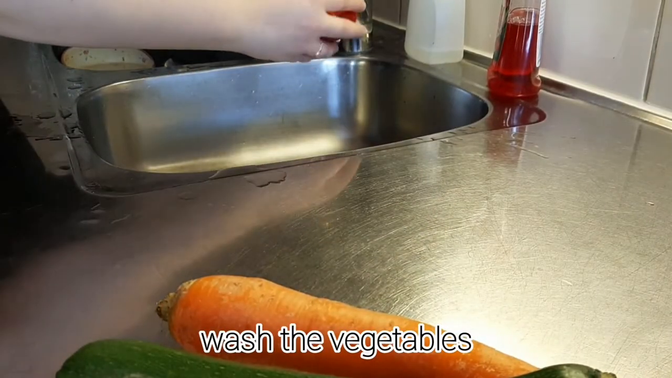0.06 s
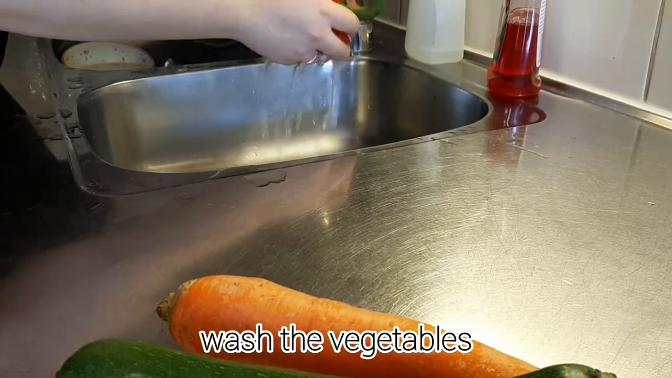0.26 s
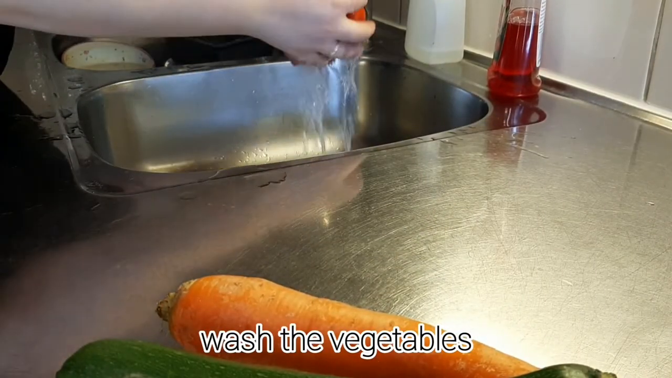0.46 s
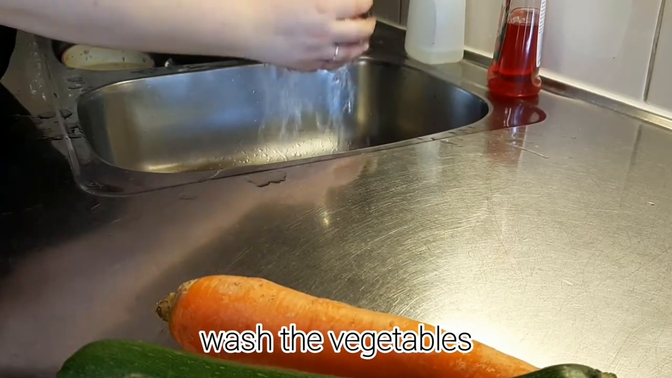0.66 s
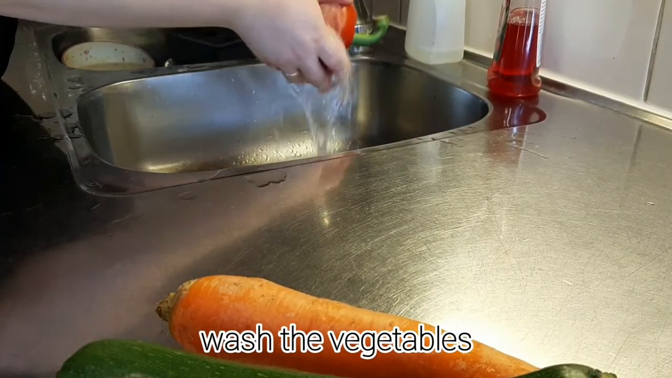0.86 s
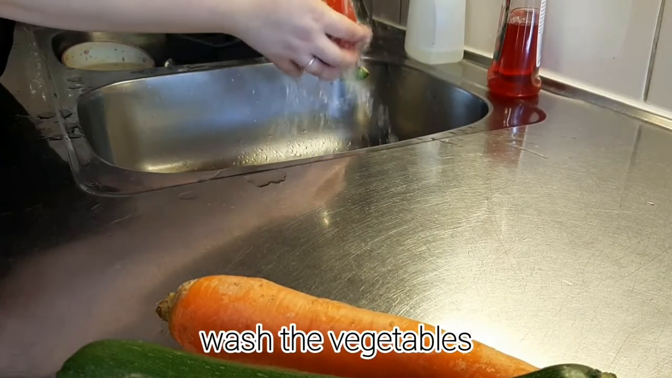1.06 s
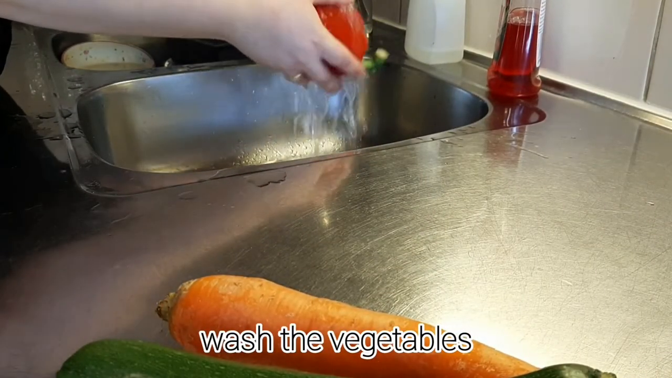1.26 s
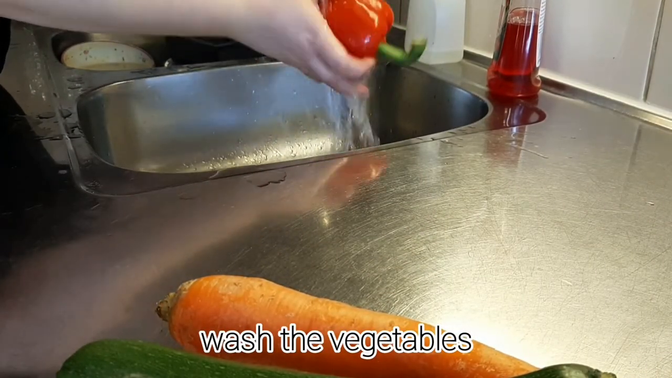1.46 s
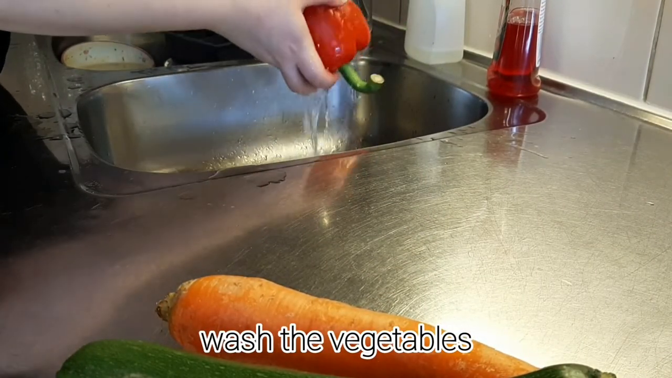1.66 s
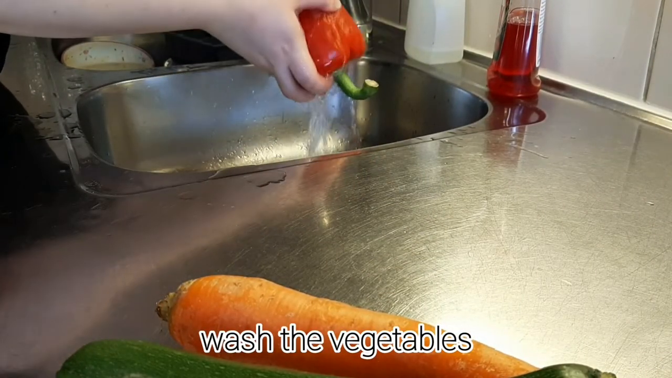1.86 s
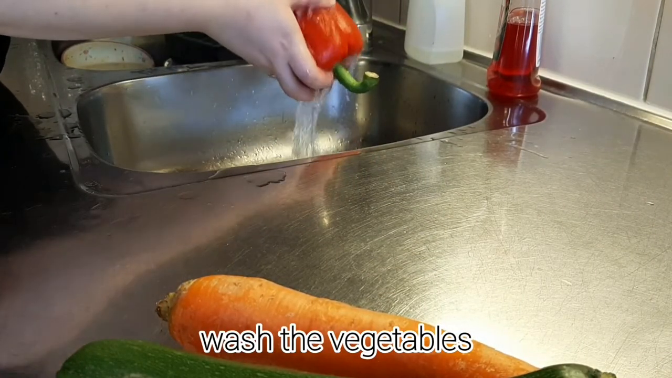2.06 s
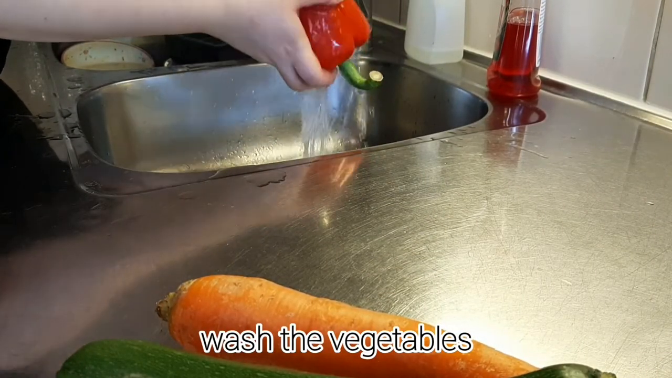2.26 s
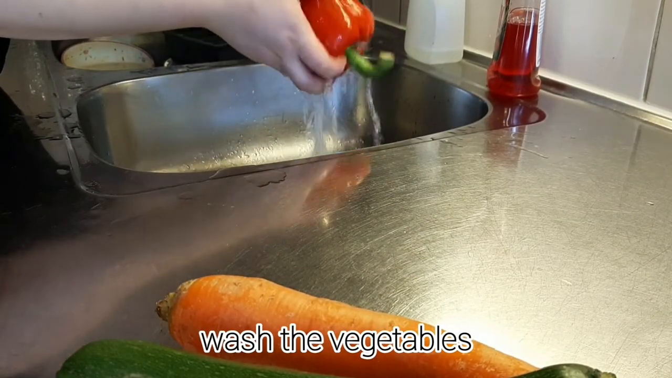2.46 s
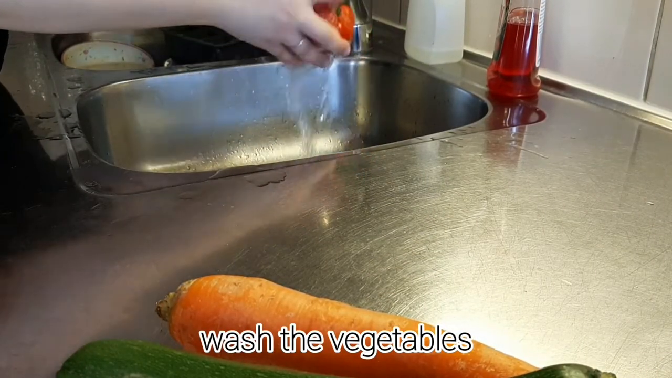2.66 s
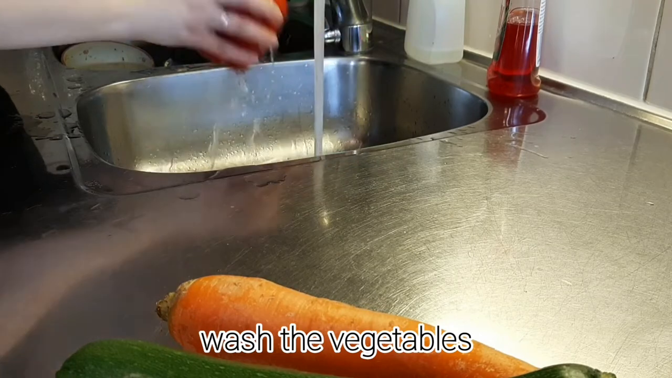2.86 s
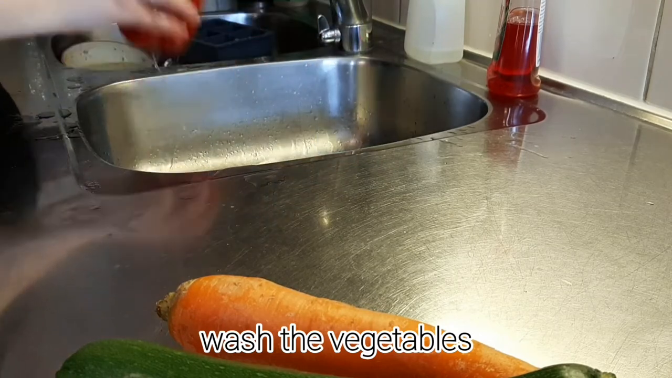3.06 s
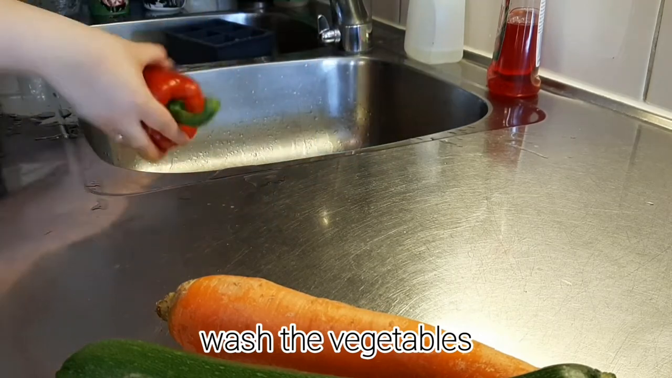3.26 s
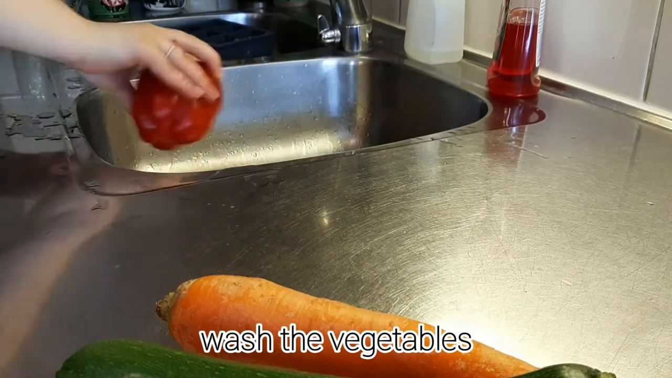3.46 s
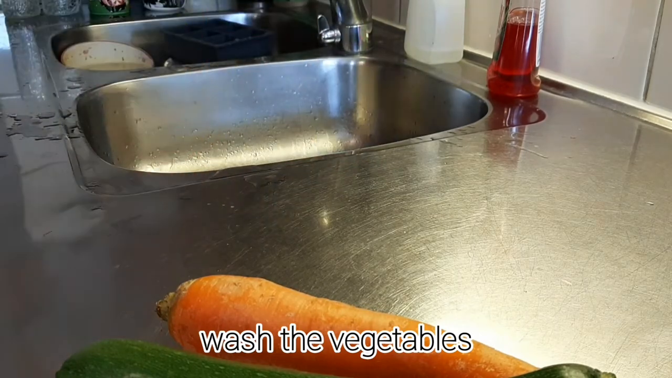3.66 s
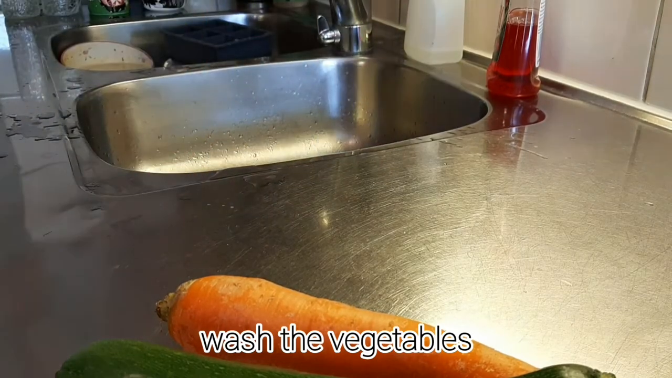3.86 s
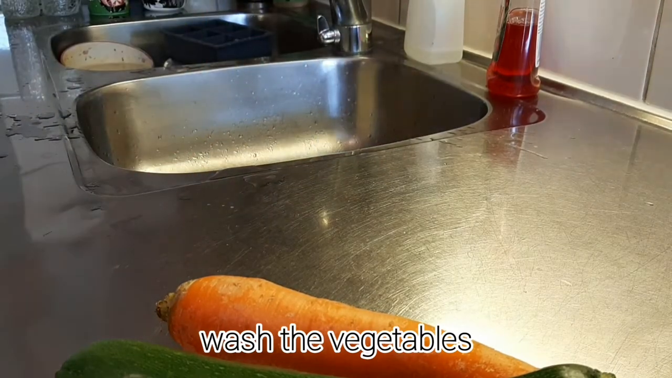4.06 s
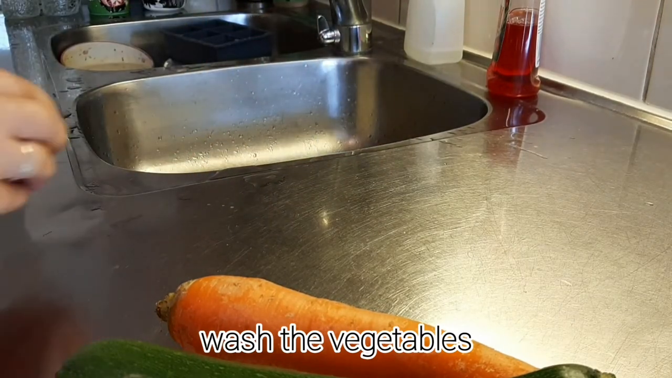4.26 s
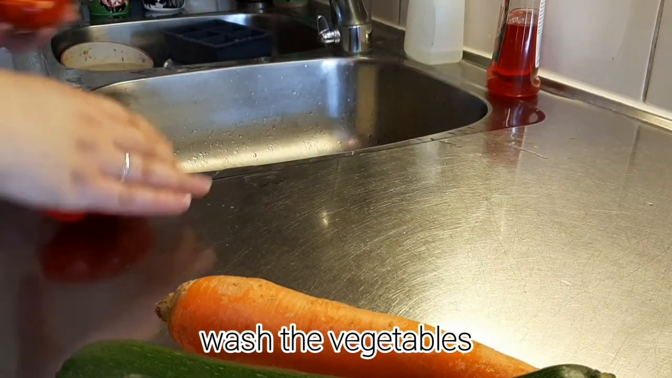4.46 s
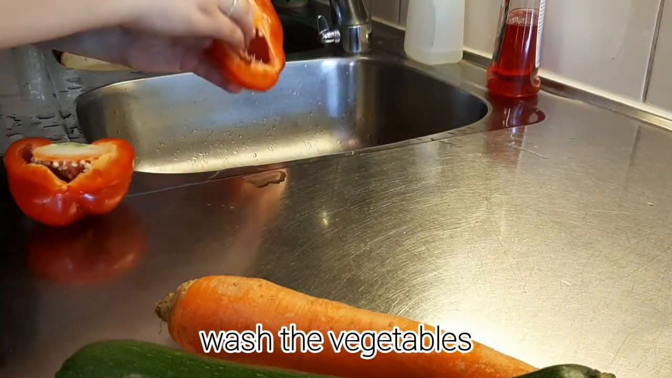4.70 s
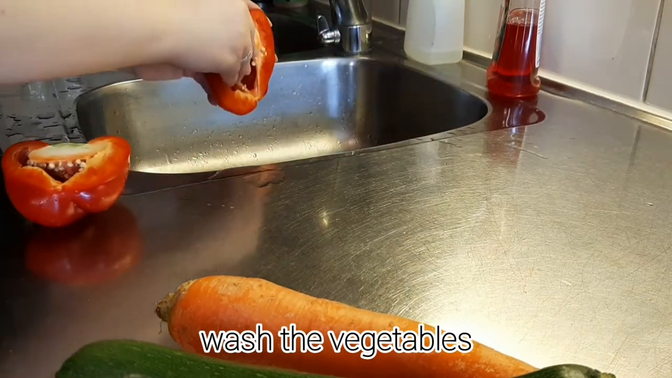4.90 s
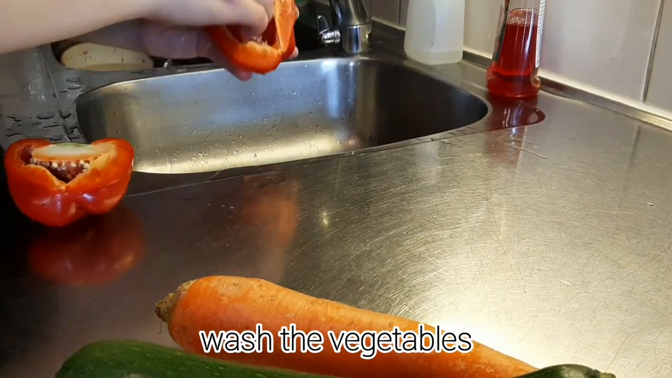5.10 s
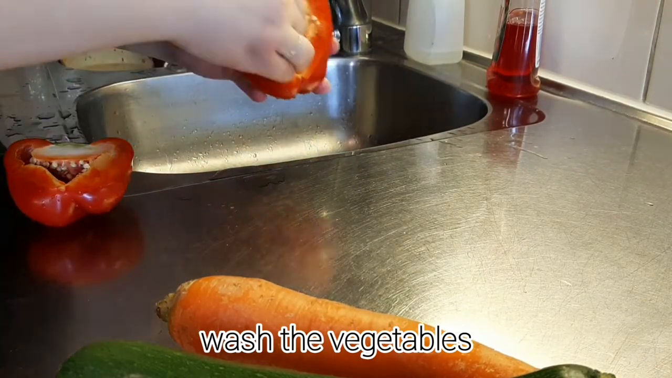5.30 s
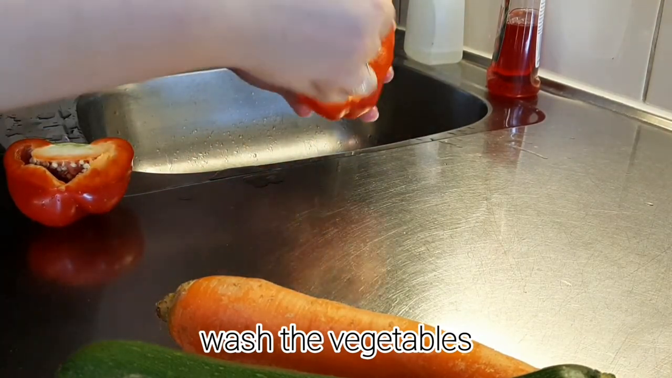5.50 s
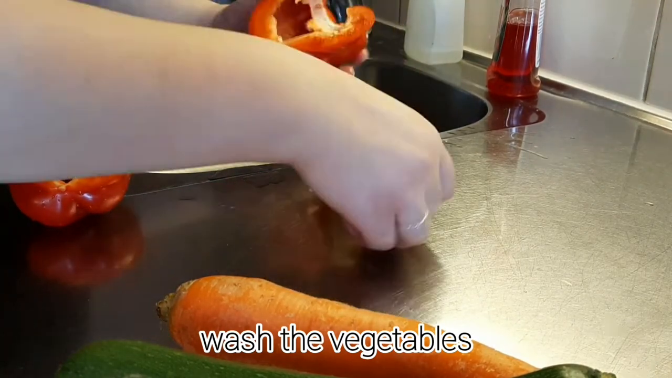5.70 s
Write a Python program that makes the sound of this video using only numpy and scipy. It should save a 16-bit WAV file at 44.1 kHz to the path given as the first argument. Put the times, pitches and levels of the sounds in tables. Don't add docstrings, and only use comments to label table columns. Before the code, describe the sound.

Tap water splashes over a pepper into a steel sink, stops with drips, then hands rustle, knock and snap the pepper's core.

```python
import sys
import numpy as np
from scipy import signal
from scipy.fft import irfft
from scipy.io import wavfile
from scipy.ndimage import uniform_filter1d

SR = 44100
rng = np.random.default_rng(int(sys.argv[2]) if len(sys.argv) > 2 else 0)


def volts_from_decibels(level):
    exponent = np.asarray(level, float) / 20
    return 10 ** exponent


def waveform_to_disk(signal):
    frames = np.transpose(np.atleast_2d(signal))
    scaled = np.clip(frames, -1, 1) * 32767
    samples = np.round(scaled).astype(np.int16)
    wavfile.write(sys.argv[1], SR, samples)


N = 253134
SHUT_S, LAST_SPRAY_S = 3.13, 3.08

# time_s [s], flow_db [dB], fineness_db [dB]
FLOW = [(0, -117, 8), (.06, -81, -2), (.098, -59, -2.5), (.25, -53, -5.5), (.3, -46.5, -0.5),
        (.41, -48, -8), (.5, -43, -5), (.76, -46.5, -6.5), (.96, -46, -5.5), (1.2, -47, -4),
        (1.77, -48.5, -2.5), (2.1, -46, -3.5), (2.26, -51, -1.5), (2.36, -45.5, -4.5), (2.77, -46.5, -6.5),
        (2.85, -41.5, -2), (3.0, -44.5, -6), (3.1, -74, -22)]
# pitch_hz [Hz], likeness [0-1]
SAME = [(60, 0.91), (130, 1), (290, 0.89), (640, 0.36), (1400, 0.), (16000, 0.)]


def evened(x):
    return x / np.sqrt(np.mean(x ** 2) + 1e-20)


def read(points, hz, axis=1):
    table = np.transpose(points)
    return np.interp(np.log(hz + 1), np.log(table[0] + 1), table[axis])


def curve(rows, t):
    s, *columns = np.transpose(rows)
    return [np.interp(t, s, c) for c in columns]


def grid(size):
    hz = np.fft.rfftfreq(size, 1 / SR)[:, None]
    return hz, np.arange(N * 4 // size + 5) * size / 4 / SR


def noise(gain):
    size = 2 * len(gain) - 2
    overlap = size * 3 // 4
    a, b, c, d = rng.standard_normal((gain.shape[1], len(gain), 4)).T
    same = np.clip(read(SAME, grid(size)[0]), -1, 1)
    left = a + 1j * b
    right = same * left + np.sqrt(1 - same ** 2) * (c + 1j * d)
    z = np.array([left, right])
    plain = signal.istft(left[:, :400], nperseg=size, noverlap=overlap)[1]
    scale = np.sqrt(np.mean(plain ** 2))
    return signal.istft(z * gain, nperseg=size, noverlap=overlap)[1][:, :N] / scale


def patches(shape, bins, frames):
    field = rng.standard_normal(shape[::-1]).T
    smooth = uniform_filter1d(field, bins, axis=0)
    return evened(uniform_filter1d(smooth, frames, axis=1))


def band(hz, spectrum, lo_hz, hi_hz):
    db = read(spectrum, hz)
    inside = (hz > lo_hz) * (hz < hi_hz)
    return db - 10 * np.log10(np.sum(volts_from_decibels(2 * db) * inside) / len(hz))


def ring(modes, detune=0.915, size=SR // 5):
    t = np.arange(size) / SR
    return sum((-1) ** k * volts_from_decibels(db - 60 * t / t60) * np.sin(2 * np.pi * hz * detune * t)
               for k, (hz, db, t60) in enumerate(modes))


def add(mix, s, sound):
    part = mix[round(s * SR):][:len(sound)]
    part += sound[:len(part)]


def scatter(per_s, spread_db, cap):
    out, count = np.zeros(N), int(per_s * N / SR)
    place, size = rng.random((count, 2)).T
    out[(place * N).astype(int)] = volts_from_decibels(spread_db * np.minimum(-np.log(size + 1e-9), cap))
    return out


def spray():
    # pitch_hz [Hz], density_db [dB per Hz]
    spray_colour = [(300, -24.5), (900, -7.5), (1800, -8), (3200, -3), (4200, -2.5), (6000, -5.5),
                    (11000, 0), (16000, -1)]
    # start_s [s], level_db [dB], pitch_hz [Hz], broad [0-1]
    splashes = [(0.066, -35, 1200, 0.03), (0.1, -34, 2110, 0.14), (0.2827, -35, 3680, 1),
                (0.308, -17, 3800, 0.1), (0.3375, -31, 3300, 0.7), (0.4748, -24, 2860, 0.3),
                (0.624, -17, 4260, 0), (0.6511, -18, 4060, 0.02), (0.679, -24, 4670, 0.1),
                (0.7302, -21, 4800, 0.28), (0.7625, -19, 4240, 0.58), (0.868, -21, 3060, 0.07),
                (0.9462, -30, 3650, 1), (1.055, -21, 3070, 0), (1.146, -26, 2580, 0.46),
                (1.324, -25.5, 3200, 0.33), (1.453, -32.5, 5250, 0.57), (1.519, -21, 1960, 0.33),
                (1.6031, -19, 5400, 0.31), (1.8103, -27, 5430, 0), (1.941, -24, 2940, 0.59),
                (2.13, -29.5, 3250, 0.52), (2.167, -21.5, 4680, 0), (2.3076, -33, 2950, 1),
                (2.4601, -19.5, 3340, 0.15), (2.547, -19, 5230, 0.27), (2.6207, -21.5, 3580, 0.4),
                (2.829, -32.5, 3870, 1), (2.902, -31.5, 3960, 0.95), (2.9924, -24.5, 2800, 0.37),
                (0.2623, -40, 2980, 0), (0.612, -21.5, 7600, 0), (0.6684, -19, 4300, .05),
                (0.9065, -34, 4580, 0.75), (1.0804, -31, 2040, 0.5), (1.4865, -31, 4690, 0.4),
                (1.677, -26, 8040, .02), (1.696, -29, 7600, 0), (1.8532, -25, 1540, 0),
                (1.926, -33, 5850, .3), (2.0015, -33, 3550, .2), (2.0443, -34, 4190, .2),
                (2.1026, -27, 1500, 0), (2.4369, -38, 2990, 0), (2.5152, -24, 5250, 0),
                (2.596, -24.5, 4200, .2), (2.9736, -28, 4620, 0.6), (1.635, -22.5, 1490, 0.35),
                (0.548, -32, 3320, 0.1), (1.753, -33, 3920, 0.03)]
    burst_t60_s, burst_db, slower_per_db = 0.061, -17.5, 0.076
    hz, t = grid(256)
    level_db, fineness_db = curve(FLOW, t)
    mist_db = level_db + fineness_db
    high = np.clip((hz - 7500) / 3000, 0, 1)
    field_db = band(hz, spray_colour, 2500, 8950)
    field_db = field_db + (1 - high) * (level_db + 0.33) + high * (mist_db + 5.0)
    shape = field_db.shape
    field_db += 1.8 * patches(shape, 9, 16)
    field_db += 2.27 * patches(shape, 60, 4)
    field_db += 1.7 * patches(shape, 25, 40)
    power = volts_from_decibels(2 * field_db) * (t < FLOW[-1][0])
    for s, db, centre_hz, broad in splashes:
        t60 = burst_t60_s * np.exp(slower_per_db * (burst_db - db))
        peak = np.exp(-(np.log((hz + 1) / centre_hz) / 0.15) ** 2)
        hump = volts_from_decibels(read(spray_colour, hz) * 0.92) * (abs(broad) + peak)
        now = (t > s + .0015) & (t < s + t60)
        power[:, now] += (hump * volts_from_decibels(db + 0.5 - 60 * (t[now] - s) / t60)) ** 2
    return noise(np.sqrt(power))


def bubbles(per_s=340.0):
    level_db = curve(FLOW, np.arange(N) / SR)[0]
    out = np.zeros((2, N))
    for hz in np.geomspace(280, 6000, num=16):
        t = np.arange(int(14 * SR / hz)) / SR
        rising = np.sin(2 * np.pi * hz * t * (1 + 0.0051 * hz * t))
        tone = rising * np.exp(-t * hz / 7.3) * np.minimum(t * hz, 1)
        hits = scatter(per_s / 16, 5.4, 2.6) * (hz / 1000) ** 0.21
        out += signal.oaconvolve(hits, tone)[:N] * rng.uniform(0.091, 1, (2, 1))
    return volts_from_decibels(level_db - 18.0) * evened(out) * (np.arange(N) < LAST_SPRAY_S * SR)


def sink():
    # pitch_hz [Hz], level_db [dB], t60_s [s]
    basin_modes = [(139, 2, 0.057), (185, -1.5, 0.16), (250.6, -3, 0.13), (333, 1, 0.049),
                   (375.6, 0.5, 0.063), (420, -4, 0.12), (550.8, 0, 0.081), (682, -5.5, 0.12),
                   (737.5, -0.5, 0.13), (900, -8.5, 0.058), (1290, -3.5, 0.039), (1520, -2, 0.046),
                   (2045, -7, 0.091), (1069, -8, 0.036)]
    # time_s [s], level_db [dB]
    landing = [(0, -9), (.2, -3), (.3, 1), (.8, -1), (1.2, -1), (1.6, 0.5), (2.3, 0), (2.85, -2.5),
               (2.97, -5.5), (3.13, -3.5)]
    base_db, follows, full_flow_db = -49, 0.36, -47.5
    t = np.arange(N) / SR
    drum_db = base_db + curve(landing, t)[0] + follows * (curve(FLOW, t)[0] - full_flow_db)
    out = np.zeros((2, N))
    for spot in rng.standard_normal((3, len(basin_modes) + 1)):
        slow = uniform_filter1d(rng.standard_normal(N // 100 + 1), 40)
        wander = evened(np.repeat(slow, 100)[:N])
        struck = rng.random((2, N)) < 500. / SR
        size_db = 3.36 * np.minimum(rng.exponential(1, (2, N)), 5)
        blows = struck * volts_from_decibels(size_db + 2.17 * wander)
        blows *= rng.choice([-1., 1.], (2, N))
        modes = [(hz, db + 2.0 * d, t60) for (hz, db, t60), d in zip(basin_modes, spot)]
        body = ring(modes, 1 + 0.0059 * spot[-1])
        out += signal.oaconvolve(blows + 0.45 * blows[::-1], body[None], axes=1)[:, :N]
    return evened(out) * volts_from_decibels(drum_db + 1.5) * np.clip((SHUT_S - t) / 0.0072, 0, 1)


def fizz(per_s=1500.0):
    # pitch_hz [Hz], relative_size [ratio]
    droplet_sizes = [(1500, 0.5), (4000, 0.87), (8000, 1.5), (14000, 2.6)]
    level_db = curve(FLOW, np.arange(N) / SR)[0]
    out = np.zeros((2, N))
    for hz in np.geomspace(1500, 14000, num=12):
        t = np.arange(int(10 * SR / hz)) / SR
        tick = np.sin(2 * np.pi * hz * t) * np.exp(-t * hz / 2.8) * read(droplet_sizes, hz)
        hits = np.array([scatter(per_s / 12, 5.0, 3.5) for side in range(2)])
        out += signal.oaconvolve(hits + 0.17 * hits[::-1], tick[None], axes=1)[:, :N]
    return volts_from_decibels(level_db - 10.0) * evened(out) * (np.arange(N) < LAST_SPRAY_S * SR)


def fan():
    # pitch_hz [Hz], density_db [dB per Hz]
    fan_colour = [(20, -26), (65, -9.5), (90, -7.5), (110, 3.5), (135, -2.5), (190, -17), (242, -10),
                  (310, -23), (500, -33), (800, -59), (1250, -50.5), (3000, -60.5), (16000, -65)]
    # time_s [s], level_db [dB]
    whistle_levels = [(0, -66), (.08, -65), (.2, -82), (3.1, -72), (3.22, -69), (3.3, -68.5), (3.5, -69.5),
                      (4.12, -73), (4.17, -69), (4.55, -66.5), (4.8, -73), (5.1, -69), (5.25, -69.5),
                      (5.7, -73.5)]
    rumble_db, pipe_db, fade_in_s = -49, 2.5, 0.11
    hz, frames = grid(4096)
    t = np.arange(N) / SR
    whistle_db = curve(whistle_levels, t)[0]
    low = np.clip((400 - hz) / 200, 0, 1)
    low_db = rumble_db + pipe_db * (frames < SHUT_S) - 9 * np.clip(1 - frames / fade_in_s, 0, 1)
    level_db = low * low_db + (1 - low) * -48
    rumble = noise(volts_from_decibels(band(hz, fan_colour, 85, 150) + level_db + 2.5))
    wander = uniform_filter1d(rng.standard_normal((2, N)), 900)
    wander = evened(uniform_filter1d(wander, 900))
    phase = 2 * np.pi * np.cumsum(1532 + 14 * wander[0]) / SR
    whistle = np.sin(phase + np.array([[0], [1.9]]))
    return rumble + volts_from_decibels(whistle_db + 3 * wander[1]) * whistle


def surges(width_hz=53.0):
    # middle_s [s], half_length_s [s], level_db [dB], pitch_hz [Hz]
    ropes = [(0.312, .06, -49, 372), (.35, .025, -47.5, 830), (0.69, 0.057, -48, 410), (1, 0.029, -49, 300),
             (1.598, 0.012, -47.5, 900), (1.97, 0.054, -53, 520), (2.498, .1, -48, 350),
             (2.849, .03, -50, 610), (3, 0.022, -64, 410), (1.1, 0.018, -46, 613), (2.7, .02, -47.5, 660),
             (1.55, .1, -52.5, 725), (1.9, .12, -54, 745), (2.4, 0.15, -52.5, 736), (2.15, .1, -54.5, 550),
             (2.6, 0.044, -50, 425), (2.07, .03, -52, 1250), (3.0, .015, -51.5, 1300)]
    out, t = np.zeros(N), np.arange(N // 8) / SR
    r = np.exp(-np.pi * width_hz / SR)
    for (s, half, db, hz), churn in zip(ropes, rng.standard_normal((len(ropes), len(t)))):
        poles = [1, -2 * r * np.cos(2 * np.pi * hz / SR), r * r]
        tone = evened(signal.lfilter([1, 0, -1], poles, churn))
        add(out, s - 2 * half, volts_from_decibels(db) * np.exp(-(t / half - 2) ** 2) * tone)
    return out


def knocks():
    # start_s [s], level_db [dB], contact_s [s], scuff_db [dB relative to blow]
    blows = [(0.957, -27.5, 0.00041, -30), (0.975, -36, 0.00045, -34), (3.403, -41.5, 0.00031, -43.5),
             (3.502, -43, 0.00056, -36), (3.734, -52, 0.00018, -25), (3.747, -48, 0.00024, -31),
             (4.086, -40.5, 0.00052, -42), (4.4113, -31, 0.0019, -43), (4.426, -34, .004, -40),
             (4.414, -34, 0.00017, -30), (4.418, -27.5, 0.00041, -32), (4.423, -31.5, 0.00025, -35),
             (4.4327, -28.5, 0.0017, -32), (4.439, -33, 0.00048, -26), (4.95, -45, 0.00011, -8),
             (5.651, -33.5, 0.0051, -43), (5.667, -22.5, 0.0005, -18), (5.671, -21, .00022, -13.5),
             (5.676, -19, 0.000096, -21), (5.682, -19, 0.00019, -33), (5.69, -24.5, 0.001, -42),
             (5.6968, -29, 0.00066, -22), (5.7035, -39, .0003, -18)]
    # pitch_hz [Hz], level_db [dB], t60_s [s]
    worktop_modes = [(93.5, -4.5, 0.056), (189, -5, 0.051), (284, -9, 0.035), (468, 8, 0.014),
                     (620, -9, 0.019), (760, 0, 0.022), (867, -1, 0.015), (1486, 2.5, 0.019),
                     (1923, 2, 0.02), (2400, -3, .02)]
    out, t = np.zeros(N), np.arange(SR // 10) / SR
    draws = zip(blows, rng.random((len(blows), 61)), rng.standard_normal((len(blows), len(t))))
    for (s, db, contact, scuff_db), chance, grit in draws:
        small = [(hz, -16 + 2.4 * np.log2(hz / 200), 0.73 / np.sqrt(hz)) for hz in 420 * 9.3 ** chance[1:]]
        push = t[:600] / contact * np.exp(-t[:600] / contact)
        body = ring(worktop_modes + small, 0.96 + 0.051 * chance[0], size=len(t))
        sound = signal.oaconvolve(body, push)[:len(t)]
        sound = sound * np.minimum(t / 0.0024, 1)
        scuff = signal.lfilter([1, -.97], [1, -1.6, .66], grit)
        scuff = scuff * np.minimum(t / 0.0035, 1) * volts_from_decibels(scuff_db - 16.0 - 60 * t / 0.066)
        add(out, s, volts_from_decibels(db) * (sound / abs(sound).max() + scuff))
    return out


def hands():
    # pitch_hz [Hz], density_db [dB per Hz]
    rubbing_colour = [(300, -22), (600, 3), (1400, 8.5), (2000, 3.5), (2600, 1.5), (4100, 2), (6000, -3),
                      (8000, -6), (11000, 0.5), (16000, 5)]
    # start_s [s], length_s [s], level_db [dB], dull_db,
    # fine_db [dB relative]
    strokes = [(3.026, 0.016, -57.5, -9.5, -1), (3.156, 0.046, -83, 17, 11.5), (3.196, 0.17, -79, 5, -5),
               (3.577, 0.0099, -66.5, -36, -16), (3.604, 0.13, -70.5, -5, -8),
               (3.774, 0.017, -66.5, -18, -12), (3.854, 0.022, -70.5, -4.5, -12),
               (4.053, 0.067, -83.5, 8, 0.5), (4.361, 0.12, -71.5, -4, -11.5),
               (4.447, 0.024, -77, 7.5, -10), (4.492, 0.13, -74.5, -5.5, -13), (4.795, .2, -82.5, -15, 2.5),
               (4.985, 0.22, -75.5, -1, 2), (5.206, 0.13, -74, -7, -9), (5.37, 0.04, -71.5, -2, -5),
               (5.608, 0.089, -85, -14, -17)]
    # start_s [s], end_s [s], pitch_hz [Hz], level_db [dB]
    slides = [
        (4.447, 4.517, 2030, -70),
        (4.47, 4.504, 3050, -73),
        (4.512, 4.665, 3270, -75),
        (4.537, 4.66, 4900, -80),
        (4.8, 4.995, 5100, -84.5),
        (3.727, 3.767, 900, -58),
        (4.945, 4.992, 756, -59),
        (4.946, 4.982, 1310, -54),
        (4.988, 5.02, 1240, -65),
        (5.58, 5.655, 4840, -82),
    ]
    # rustle_db, dull_db, fine_db [dB]
    still_db = (-99, -88, -87)
    rise_db_per_s, fall_db_per_s = 1498, 261
    hz, t = grid(256)
    parts = volts_from_decibels(2 * np.array(still_db))[:, None] * np.ones(len(t))
    for start, length, db, dull, fine in strokes:
        before_db = (start - t) * rise_db_per_s
        after_db = (t - start - length) * fall_db_per_s
        loss = np.maximum(np.maximum(before_db, after_db), 0)
        parts = parts + volts_from_decibels(2 * (db + np.array([[0], [dull], [fine]]) - loss))
    level_db, dull_db, fine_db = 10 * np.log10(parts)
    low, high = np.clip((1900 - hz) / 500, 0, 1), np.clip((hz - 7500) / 3000, 0, 1)
    field_db = band(hz, rubbing_colour, 2500, 7500) + (1 - low - high) * (level_db - 1.0)
    field_db = field_db + low * (dull_db + 4.0) + high * (fine_db + 7.5)
    field_db += (1 - high) * 3.56 * patches(field_db.shape, 3, 40)
    field_db += 2.0 * patches(field_db.shape, 40, 5)
    power = volts_from_decibels(2 * field_db) * (t > strokes[0][0])
    for start, end, band_hz, db in slides:
        hiss = volts_from_decibels(2 * (db + 20.5)) * np.exp(-((hz - band_hz) / 120) ** 2)
        flicker = volts_from_decibels(3.0 * patches((1, len(t)), 1, 12))
        power += hiss * flicker * np.clip(np.minimum(t - start, end - t) / 0.0096, 0, 1)
    return noise(np.sqrt(power))


def drips():
    # start_s [s], level_db [dB], pitch_hz [Hz]
    drops = [(3.112, -53, 1270), (3.132, -46, 1290), (3.155, -47.5, 705), (3.179, -61, 1750),
             (3.197, -47, 1077), (3.213, -54, 1970), (3.272, -56, 2400), (3.286, -52, 1370),
             (3.292, -52, 900), (3.205, -52, 1180), (3.342, -61, 1530), (3.382, -51, 2125),
             (3.39, -62.5, 2310), (3.408, -48, 900), (3.5, -64, 2750), (4.773, -56, 1230)]
    out, t = np.zeros(N), np.arange(2000) / SR
    for (s, db, hz), spatter in zip(drops, rng.standard_normal((len(drops), len(t)))):
        rough = 1 + 0.67 * evened(uniform_filter1d(spatter, 60))
        tone = np.sin(2 * np.pi * hz * t * (1 + 1.6 * t)) * rough
        add(out, s, volts_from_decibels(db - 60 * t / 0.056) * np.minimum(t / 0.008, 1) * tone)
    return out


def snaps():
    # start_s [s], level_db [dB], pitch_hz [Hz], crackle_db, hiss_db [dB relative]
    fractures = [(3.584, -73.5, 1520, -3.5, 26), (5.0464, -45, 1140, -16.5, 16.5),
                 (5.062, -57, 1900, -2, 0), (5.069, -52.5, 1490, -2.5, 10), (5.074, -53, 1290, -8, 14),
                 (5.092, -54, 1490, -5, -5), (5.101, -29, 1300, -14, -32), (5.109, -42.5, 1200, -8, -3),
                 (5.118, -44, 1134, -7, -8), (5.1385, -29.5, 1395, -19.5, 2), (5.168, -50, 1290, -11, -8),
                 (5.175, -43, 1230, -3, -4), (5.191, -39, 1180, -19, -8), (5.1827, -25, 1385, -15, 0.5),
                 (5.2, -47, 1210, -27, -22), (5.356, -56, 1430, -12, -7)]
    crackle_t60_s, hiss_t60_s = 0.11, 0.095
    out, t = np.zeros((2, N)), np.arange(6000) / SR
    for (s, db, hz, crackle_db, fine_db), fibres in zip(fractures, rng.standard_normal((len(fractures), 3, len(t)))):
        modes = [(hz, -4.5, .02), (1.9 * hz, -8, .02), (1.12 * hz, 0.5, .008), (0.73 * hz, -14, .01),
                 (1.25 * hz, -7, .016), (2.36 * hz, -7, .014), (4.2 * hz, -14, .01)]
        hollow = ring(modes, size=len(t))
        torn = fibres[:2] * volts_from_decibels(3.4 * evened(uniform_filter1d(fibres[2], 60)))
        crackle = signal.lfilter([1, -.95], [1, -1.82, .88], torn) * volts_from_decibels(-3.0 - 60 * t / crackle_t60_s)
        rung = signal.oaconvolve(crackle, hollow[None, :1500], axes=1)[:, :len(t)]
        crackle = crackle + volts_from_decibels(-25.0) * rung
        crackle = crackle + np.diff(torn, prepend=0) * volts_from_decibels(fine_db - 60 * t / hiss_t60_s)
        add(out[0], s, volts_from_decibels(db) * (hollow + volts_from_decibels(crackle_db) * crackle[0]))
        add(out[1], s + 0.00013, volts_from_decibels(db - 2.5) * (hollow + volts_from_decibels(crackle_db) * crackle[1]))
    return out


def kitchen(x):
    # pitch_hz [Hz], t60_s [s]
    room_decay = [(200, 0.15), (1000, 0.2), (4000, 0.18), (12000, 0.03)]
    taps = np.zeros((2, SR // 2))
    jitter = rng.integers(0, 20, (2, (SR // 2 - 121) // 20))
    at = np.arange(120, SR // 2 - 20, 20) + jitter
    np.put_along_axis(taps, at, rng.choice([-1., 1.], at.shape), 1)
    hz, t, z = signal.stft(taps, SR, nperseg=256)
    same = np.clip(read(SAME, hz), 0, 1)[:, None]
    z = np.array([z[0], same * z[0] + np.sqrt(1 - same ** 2) * z[1]])
    decay = volts_from_decibels(-60 * t / read(room_decay, hz)[:, None])
    tail = signal.istft(z * decay, SR, nperseg=256)[1]
    return signal.oaconvolve(x, tail / np.linalg.norm(tail[0]), axes=1)[:, :N]


def scene():
    near = knocks() + drips() + surges()
    low = np.array([np.roll(near, 9), near]) + bubbles()
    high = snaps()
    walls = kitchen(volts_from_decibels(-8.0) * low + volts_from_decibels(-16.0) * high)
    return low + high + walls + spray() + sink() + hands() + fan() + fizz()


def roll_off(x):
    return signal.sosfilt(signal.butter(12, 16510, fs=SR, output="sos"), x)


def record(dry):
    # pitch_hz [Hz], left_db [dB], right_db [dB]
    port_colours = [(22.1, -0.5, 9.5), (60, -2, 1.5), (147, -0.5, 5), (755, 0.5, 2.5), (2230, 1.5, 5.5),
                    (4000, 3, 2.5), (5700, 5.5, -1), (7970, 1, -24), (8550, -6.5, -55),
                    (10640, -4.5, -15.5), (11330, -2.5, -11.5), (15300, -5.5, -8)]
    # start_s [s], end_s [s]
    gap_s = (3.7665, 3.7753)
    # start_s [s], step [full scale]
    jumps = [
        (3.7756, .008),
        (3.7781, -.012),
        (3.7858, .016),
    ]
    edge_hz = 15800
    hz, t = np.fft.rfftfreq(2048, 1 / SR), np.arange(N) / SR
    colour_db = np.array([read(port_colours, hz), read(port_colours, hz, axis=2)])
    colour = volts_from_decibels(colour_db) * (hz < edge_hz)
    kernel = np.roll(irfft(colour), 1024, axis=1) * np.hanning(2048)
    padded = np.pad(dry, ((0, 0), (1024, 1023)), "reflect")
    x = signal.oaconvolve(padded, kernel, "valid", axes=1)
    x = x * np.clip(np.maximum(gap_s[0] - t, t - gap_s[1]) / 0.0003, .06, 1)
    x = x + sum(step * np.clip((t - s) * SR / 2, 0, 1) * np.exp(-abs(t - s) / 0.0045) for s, step in jumps)
    return roll_off(x)


dry = scene()
out = record(dry)
waveform_to_disk(out)
```